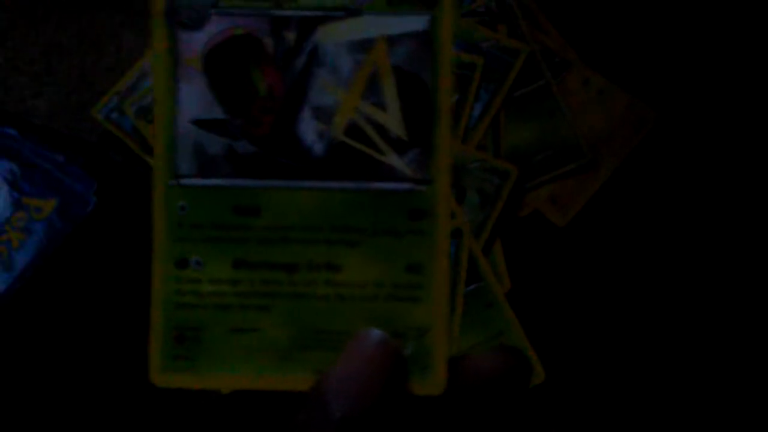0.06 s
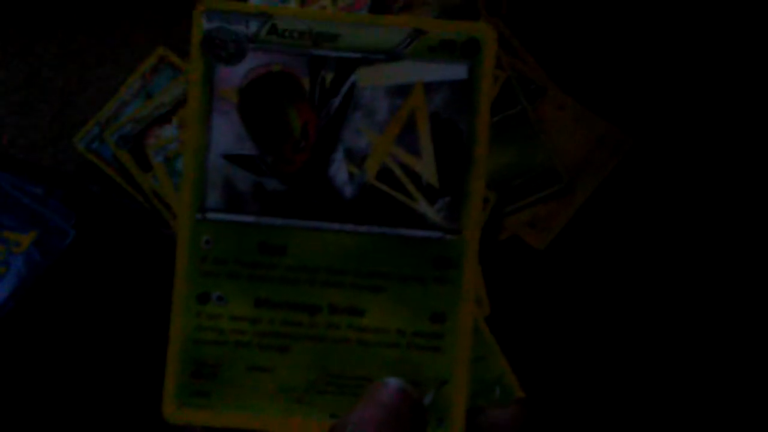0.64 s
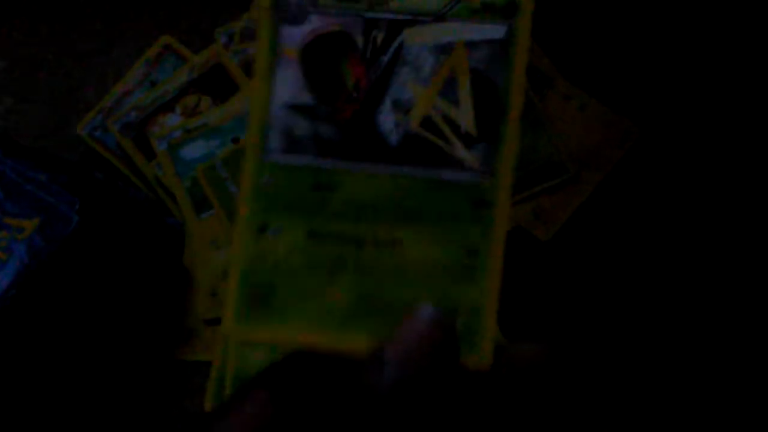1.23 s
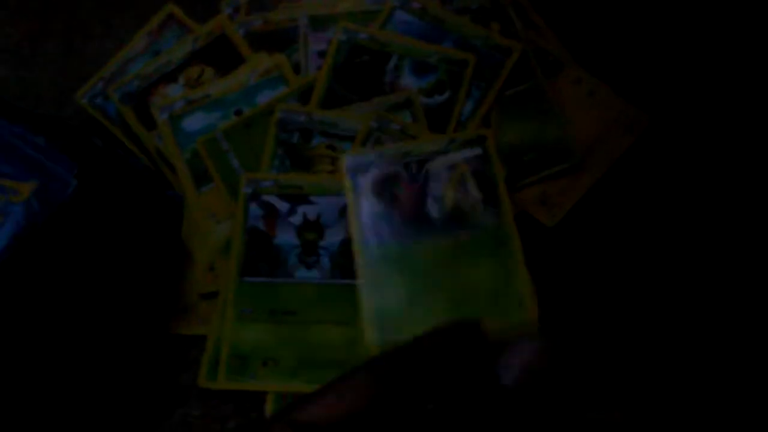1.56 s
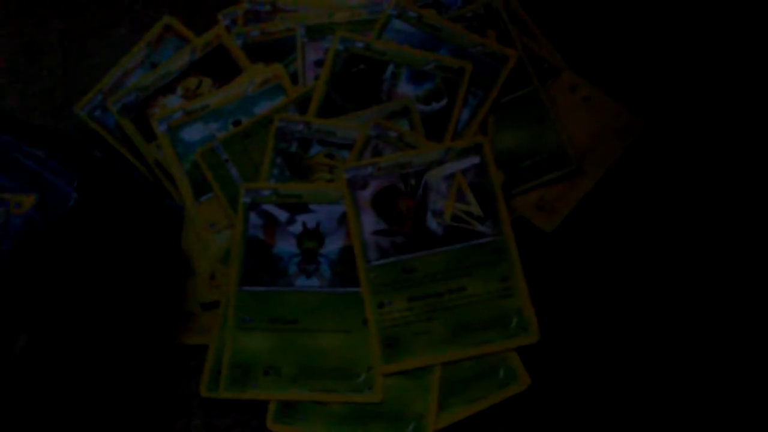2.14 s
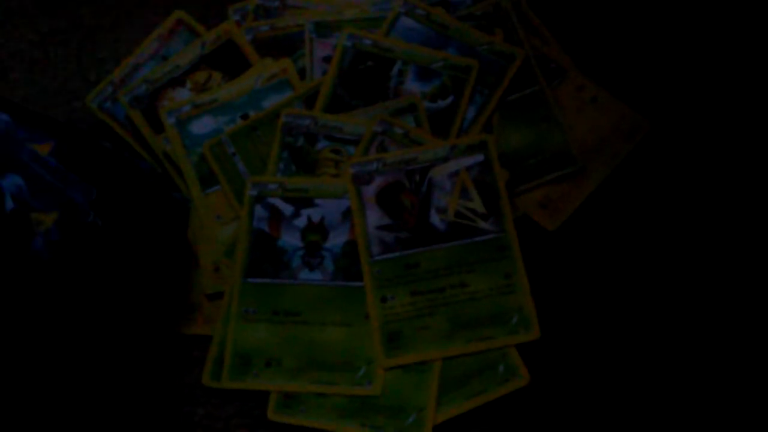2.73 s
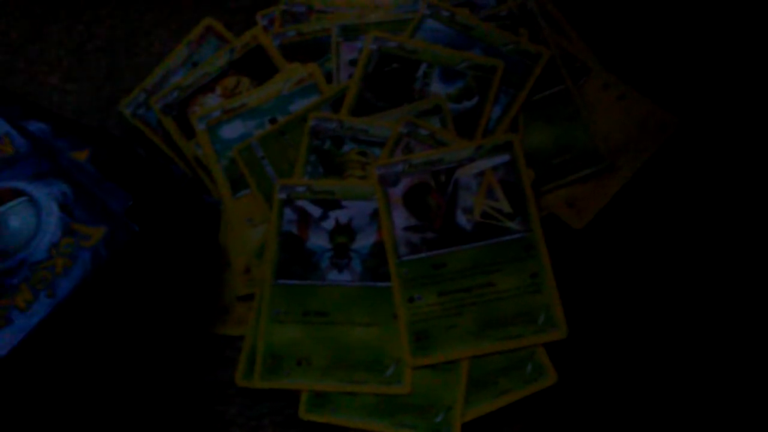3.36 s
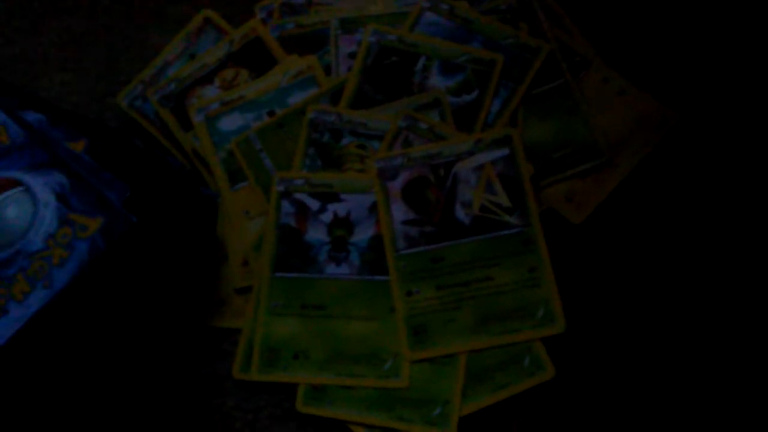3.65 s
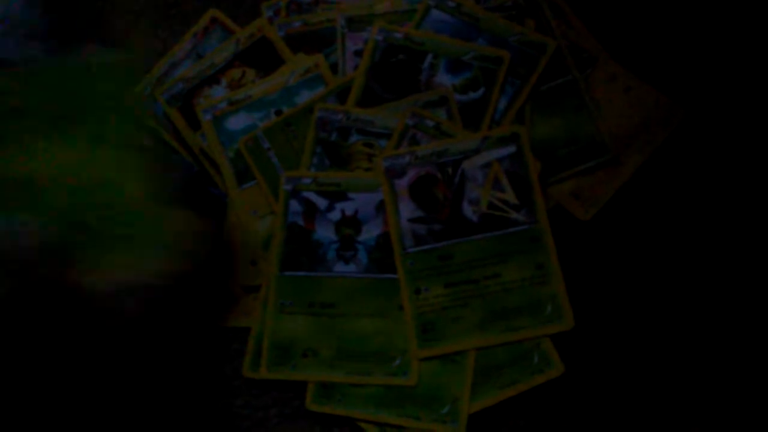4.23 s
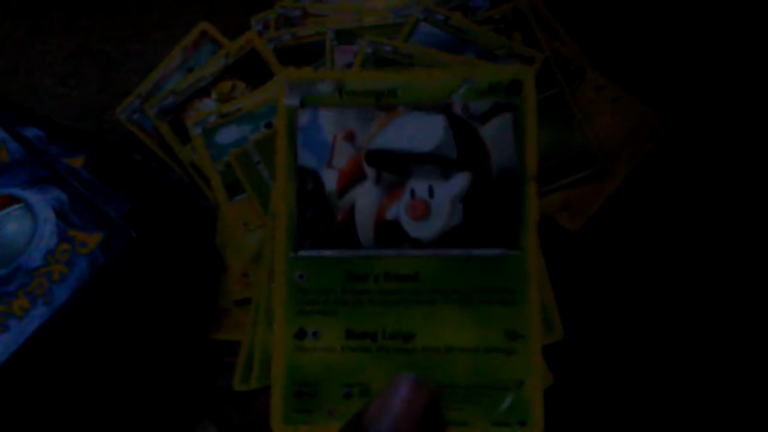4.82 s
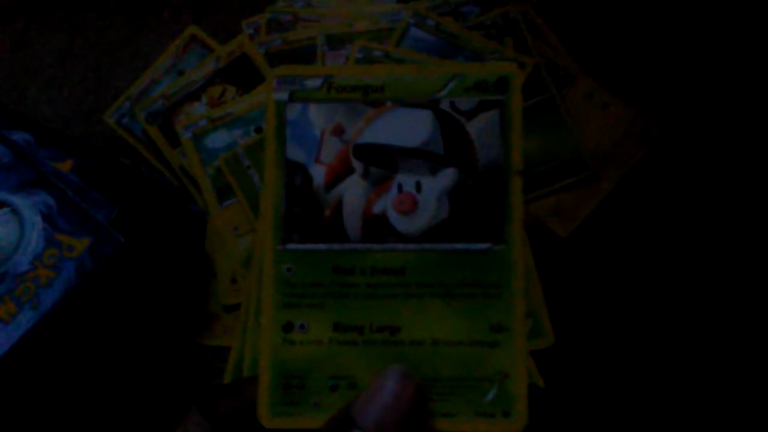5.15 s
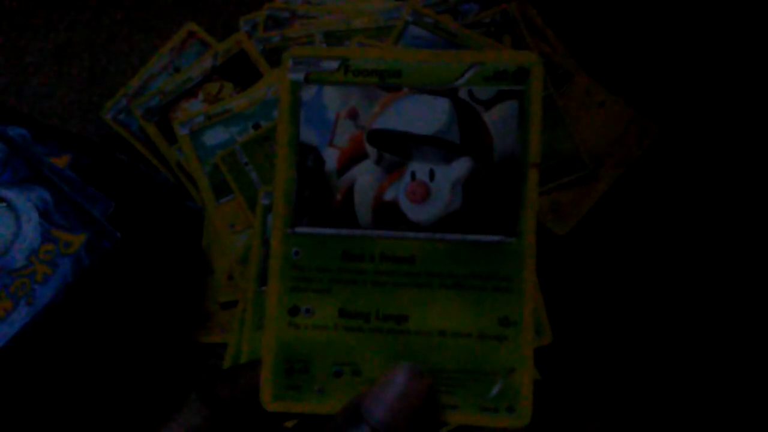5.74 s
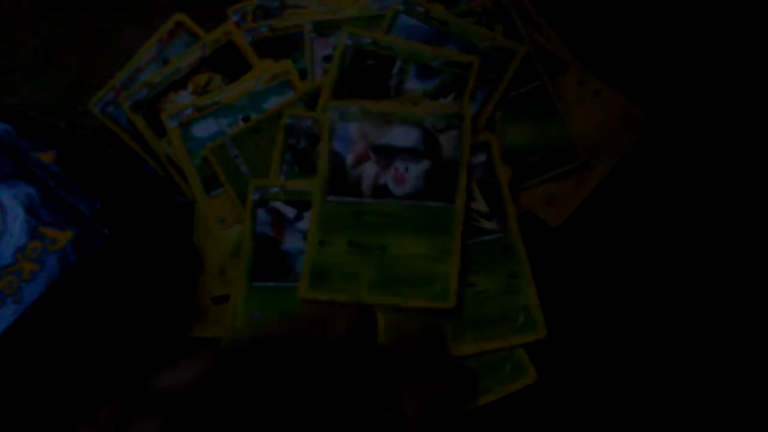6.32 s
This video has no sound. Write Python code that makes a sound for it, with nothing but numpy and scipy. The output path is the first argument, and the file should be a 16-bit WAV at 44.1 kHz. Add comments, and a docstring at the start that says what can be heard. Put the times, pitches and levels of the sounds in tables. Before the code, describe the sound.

Stiff trading cards snap onto a pile and slide with soft rustles and a faint squeak in a quiet room.

```python
"""A low room rumble and the dull rub of hands, then a stiff trading card snaps onto a pile on a table.
The next card is drawn from its stack with a rustle and a faint squeak, both made by sliding friction,
held up, and snapped down too. Each snap is a bowed card springing off the thumb: it cracks, rings
in its bending modes and settles in small ticks. Hands bump the table softly; the room is small and quiet."""
import sys
import numpy as np
from scipy import signal
from scipy.fft import rfft, irfft
from scipy.io import wavfile
from scipy.ndimage import uniform_filter1d

SR = 44100
rng = np.random.default_rng(int(sys.argv[2]) if len(sys.argv) > 2 else 0)


def inscribe(sig):
    """Save sig as 16-bit PCM at rate SR to the path in sys.argv[1].

    A 1-D sig is mono; a 2-D sig holds one channel per row.
    Samples are clipped to [-1, 1] before scaling.
    """
    pcm = np.round(np.clip(np.atleast_2d(sig).T, -1, 1) * 32767)
    wavfile.write(sys.argv[1], SR, pcm.astype(np.int16))


N = 290178
TIME = np.arange(N) / SR


def amp(db):
    """Amplitude ratio of a level in decibels."""
    return 10 ** (np.asarray(db) / 20)


def unit(x):
    """Normalisation to rms 1."""
    return x / np.sqrt(np.mean(x ** 2) + 1e-20)


def read(points, hz):
    """Interpolation of a spectrum along log frequency."""
    f, value = np.transpose(points)
    return np.interp(np.log(hz + 1), np.log(f), value)


def add(mix, s, sound):
    """Superposition of a sound on the mix at s seconds."""
    part = mix[round(s * SR):][:len(sound)]
    part += sound[:len(part)]


def colour(x, points, size=4096):
    """Minimum-phase filtering through points of frequency in Hz and gain in dB."""
    log_gain = np.log(amp(read(points, abs(np.fft.fftfreq(size, 1 / SR)))))
    taps = np.fft.ifft(np.exp(np.conj(signal.hilbert(log_gain)))).real
    return signal.fftconvolve(x, taps[:size // 2])[:len(x)]


def noise(points):
    """Gaussian noise of rms 1 with the given spectral shape."""
    return unit(colour(rng.standard_normal(N), points))


def drift(hz):
    """Random fluctuation of rms 1, low-passed at about hz."""
    low_pass = np.exp(-(np.fft.rfftfreq(N, 1 / SR) / hz) ** 2)
    return unit(irfft(rfft(rng.standard_normal(N)) * low_pass, N))


def resonate(x, hz, width_hz):
    """Forced response, scaled to rms 1, of a steep resonance that follows the curve hz."""
    turn = np.exp(2j * np.pi * np.cumsum(hz) / SR)
    r = np.exp(-np.pi * width_hz / SR)
    return unit((turn * signal.lfilter([(1 - r) ** 2], [1, -2 * r, r * r], x / turn)).real)


def stroke(s, db, swell_s, fade_s, roundness=1.4):
    """Envelope of one movement: it peaks at s and is 20 dB down swell_s before and fade_s after."""
    away = np.maximum((s - TIME) / swell_s, (TIME - s) / fade_s)
    return amp(db - 20 * np.clip(away, 0, 10) ** roundness)


def strokes(rows):
    """Incoherent addition: the powers of several movements sum."""
    return np.sqrt(sum(stroke(*row) ** 2 for row in rows))


def room_rumble(level_db=-62, waver_db=1.47):
    """Ambient noise: a rumble and a faint hiss under gentle random amplitude modulation."""
    # Room noise. Each row: frequency in Hz, relative spectral density in dB.
    spectrum = [(18, -39.5), (30, -6), (59, 3.5), (106, -13.5), (134, -20.5), (233, -16.5), (266, -20),
                (426, -17.5), (649, -20), (780, -20), (2170, -28), (2680, -25), (3400, -30.5), (5590, -32),
                (16000, -37.5)]
    return amp(level_db + waver_db * drift(19)) * noise(spectrum)


def hand_rub(gain_db=-3, rest_db=-68, fidget_db=2.5):
    """Skin friction makes a dull, uneven noise that swells as the grip shifts."""
    # Shifts of grip. Each row: peak time in seconds, relative level in dB, swell and fade in seconds.
    grips = [(.38, -56.5, 1, 0.29), (1.1, -58, 1, 0.89), (1.58, -52, 0.36, 0.27), (2.33, -63.5, 0.24, 1),
             (3.23, -56.5, 0.43, 0.49), (3.75, -58, 0.39, 0.5), (4.45, -61, 0.28, 0.49),
             (5.3, -67, .3, .45), (6.0, -59.5, .3, .7)]
    # Rubbing skin. Each row: frequency in Hz, relative spectral density in dB.
    spectrum = [(30, -29), (60, -4), (105, 4), (200, -9), (450, -17.5), (900, -26), (2000, -38)]
    envelope = np.hypot(amp(rest_db), strokes(grips)) * amp(fidget_db * drift(8))
    return amp(gain_db) * envelope * noise(spectrum)


def mains_hum():
    """Steady partials lie near the mains frequency and its harmonics."""
    # The hum. Each row: frequency in Hz, rms level in dB.
    partials = [(59.5, -77), (120, -79), (239, -80.5)]
    return sum(amp(db) * np.sqrt(2) * np.sin(2 * np.pi * (hz * TIME + rng.random()))
               for hz, db in partials)


def reverberation(x, near_db=-17, near_t60=0.078, tail_db=-17, delay_s=.005, size=128):
    """A diffuse field is noise whose energy decays exponentially: table scatter, then the room."""
    # The room's decay. Each row: frequency in Hz, time to fall 60 dB in seconds.
    decay_times = [(200, 0.1), (1000, 0.13), (4000, 0.28), (8000, 0.32), (15000, 0.1976)]
    # The tone of the reflections. Each row: frequency in Hz, gain in dB.
    response = [(150, -0.5), (600, 7.5), (1000, 6.5), (1500, 5.5), (2600, 3.5), (4000, 0), (5500, -3.5),
                (8000, -3.5), (14000, 0.5)]
    hz, _, spectra = signal.stft(x, SR, nperseg=size)
    power = abs(uniform_filter1d(abs(spectra) ** 2, size=3, axis=0))
    step_s = size / 2 / SR
    field = np.zeros(power.shape)
    for band, room_t60 in enumerate(read(decay_times, hz)):
        for db, t60 in (near_db, near_t60), (tail_db, room_t60):
            retained = np.exp(-2 * np.log(1000) * step_s / t60)
            field[band] += amp(db) ** 2 * signal.lfilter([1 - retained], [1, -retained], power[band])
    carrier = signal.stft(rng.standard_normal(N), SR, nperseg=size)[2]
    diffuse = signal.istft(carrier / carrier.std() * np.sqrt(field), SR, nperseg=size)[1][:N]
    out = np.zeros(N)
    add(out, delay_s, colour(diffuse, response))
    return out


def with_echoes(x):
    """Comb filtering: early reflections join the direct sound within a few milliseconds."""
    # Reflections off hand and table. Each row: delay in seconds, gain in dB.
    reflections = [(.0015, -12.5), (.0031, -19.5)]
    out = x.copy()
    for delay_s, db in reflections:
        add(out, delay_s, amp(db) * x)
    return out


def table_bumps(table_hz=62, thud_s=0.018, rise_s=0.0064, knock_s=0.0084):
    """A soft impact excites a damped low mode of the table top, under a short dull knock."""
    # Bumps of a hand or card. Each row: start in seconds, thud level and knock level in dB.
    bumps = [(1.365, -34, -51), (1.5, -29.5, -51), (1.509, -26, -64), (1.531, -34, -40.5),
             (1.574, -40, -60), (3.256, -51, -53), (3.324, -49, -60), (6.18, -51, -52.5),
             (6.358, -45, -36.5), (6.377, -47, -40), (6.387, -59, -44), (6.395, -40, -49),
             (6.43, -41, -42.5)]
    knock_spectrum = [(80, 0), (220, 7.5), (400, -2.0), (850, -4.5), (1400, -28.5), (4000, -44)]
    t, out = np.arange(SR // 5) / SR, np.zeros(N)
    thud = -np.sin(2 * np.pi * table_hz * t) * np.exp(-t / thud_s) * (1 - np.exp(-t / rise_s))
    for s, thud_db, knock_db in bumps:
        knock = unit(colour(rng.standard_normal(len(t)), knock_spectrum)) * np.exp(-t / knock_s)
        add(out, s, amp(thud_db) * thud + amp(knock_db) * knock)
    return out


def face_glide(gain_db=-2):
    """Sliding friction between glossy faces makes a broadband hiss that grows with speed."""
    # Glides. Each row: peak time in seconds, relative level in dB, swell and fade in seconds.
    glides = [(.75, -70.5, .17, .85), (1.42, -64.5, 0.34, 0.27), (1.88, -62, 0.62, 0.48),
              (2.15, -66, 0.33, 0.82), (2.52, -65, .04, 0.57), (2.79, -67.5, 0.14, 0.46),
              (3.085, -52, 0.097, 0.16), (3.42, -62.5, 0.21, 0.6), (3.695, -56, 0.074, .04),
              (3.83, -63.5, 0.32, 0.88), (4.22, -64, 0.47, 0.86), (4.48, -69.5, 0.14, .2),
              (6.19, -60, 0.15, 0.14), (6.35, -61, 0.11, 0.11), (6.55, -59.5, 0.28, 0.11)]
    # The hiss. Each row: frequency in Hz, relative spectral density in dB.
    spectrum = [(1500, -24.5), (3000, -6.5), (5000, -4.5), (7800, -2.5), (10000, -5), (12000, -10),
                (16000, -16)]
    return amp(gain_db) * noise(spectrum) * strokes(glides)


def edge_scrape(catches_per_s=2400, spread_db=3.0, judder_db=1.5, rasp_db=-4, sing_db=-5.5):
    """Fibres catch under a moving edge, and the impulses force the card's free part to resonate."""
    # Scrapes over the cards below. Each row: peak time in seconds, relative level in dB,
    # swell and fade in seconds, resonance of the free part in Hz.
    scrapes = [(1.39, -58, 0.24, .19, 5190), (1.534, -56, 0.01, 0.011, 4940),
               (1.975, -49, 0.028, 0.051, 3850), (2.514, -56.5, .035, 0.06, 5200),
               (2.559, -59.5, 0.042, 0.085, 4400), (2.752, -58, 0.018, .035, 5460),
               (2.995, -60, .02, .04, 5200), (3.086, -42, 0.055, 0.065, 4940),
               (3.132, -47, 0.022, .028, 5325), (3.182, -47.5, 0.012, .06, 5290),
               (3.26, -51, 0.14, 0.062, 4514), (3.375, -54, 0.15, 0.046, 5400),
               (3.696, -56, .05, 0.052, 5800), (3.756, -58, .015, 0.063, 4800),
               (3.87, -62, .09, 0.082, 4600), (6.2, -67.5, 0.33, 0.16, 5000),
               (6.553, -53.5, 0.048, 0.072, 4800)]
    # The rasp. Each row: frequency in Hz, relative spectral density in dB.
    spectrum = [(760, -53.5), (1300, -43), (1690, -26), (2340, -4), (3240, -8), (3350, -6), (3920, -1),
                (4540, -2), (4930, -6), (5720, 0.5), (6620, -4), (8790, -11), (9660, -15), (14600, -28),
                (16000, -33)]
    # Modes of the free part. Each row: ratio to its resonance, width in Hz, relative level in dB.
    modes = [(.72, 600, -8.5), (.97, 800, 3.5), (1.18, 900, 1), (1.45, 1300, -6.5)]
    caught = rng.random(N) < catches_per_s / SR
    strength = amp(spread_db * np.minimum(rng.exponential(1, N), 5))
    catches = unit(caught * strength * rng.choice([-1, 1], N))
    friction = (catches + 0.85 * rng.standard_normal(N)) * amp(judder_db * drift(70))
    power = np.array([stroke(*row[:4]) ** 2 for row in scrapes])
    hz = np.array(scrapes)[power.argmax(0), 4]  # the strongest stroke sets the resonance
    sing = unit(sum(amp(db) * resonate(friction, ratio * hz, width) for ratio, width, db in modes))
    rasp = unit(colour(friction, spectrum))
    return (amp(rasp_db) * rasp + amp(sing_db) * sing) * np.sqrt(power.sum(0))


def squeak(gain_db=-2, mid_hz=4230, mid_s=2.22, rise_hz_per_s=550, width_hz=290, flutter_db=2.6):
    """Stick-slip friction drives a narrow resonance of the drawn card; a hard pull wakes others."""
    # Pulls on the card. Each row: peak time in seconds, relative level in dB, swell and fade in seconds.
    pulls = [(2.125, -59, 0.15, 0.1), (2.28, -51.5, 0.081, 0.25)]
    # Side modes. Each row: ratio to the main frequency, width in Hz, relative level in dB.
    modes = [(.5, 220, -10.5), (.54, 220, -9), (.645, 240, -8), (1.115, 300, -7.5)]
    hz = mid_hz + rise_hz_per_s * (TIME - mid_s)  # the free part shortens, so its note climbs
    pull = strokes(pulls)
    friction = rng.standard_normal(N) * amp(flutter_db * drift(50))
    main = resonate(friction, hz, width_hz)
    others = sum(amp(db) * resonate(friction, ratio * hz, width) for ratio, width, db in modes)
    return amp(gain_db) * pull * (main + (pull / pull.max()) ** 0.17 * others)


def flick(edge_db, slap_db, ring_db, belly_db, rise_s, flex_s, fibres_db,
          bowed_hz=6700, flat_hz=4000, relax_s=.0018, belly_hz=2320, belly_s=0.002,
          travel_s=0.001, crack_db=10, fibres_s=0.0025):
    """Free vibration of a released card: a dispersed crack, a falling note and ringing modes."""
    # Modes of the card on its pile. Each row: frequency in Hz, relative level in dB, T60 in seconds.
    modes = [(426.7, -28, 0.062), (577.8, -26.5, 0.047), (782, -23, 0.014), (1040, -35.5, .02),
             (1480, -23.5, 0.025), (2130, -19.5, .02), (2660, -32, 0.029), (3020, -11.5, .025),
             (3420, -18, 0.027), (3950, -12, 0.03), (4330, -12.5, 0.022), (4860, -17.5, .02),
             (5544, -28.5, 0.0142), (5900, -26, .014), (7580, -25, 0.015), (9755, -34, 0.0077),
             (12100, -35.5, 0.0039)]
    # The crack of a freed edge. Each row: frequency in Hz, gain in dB.
    crack_spectrum = [(200, -18), (600, -6), (1200, -9.5), (2400, 1), (5500, 0.5), (7500, 5), (9300, -3),
                      (10500, -4), (12500, -12.5), (16000, -29)]
    t, bins = np.arange(SR // 12) / SR, np.fft.rfftfreq(SR // 12, 1 / SR)
    onset = 1 - np.exp(-(t / rise_s) ** 2)
    # a bowed corner is stiffer, so its note drops as it flattens
    hz = flat_hz + (bowed_hz - flat_hz) * np.exp(-t / relax_s)
    flex = np.sin(2 * np.pi * np.cumsum(hz) / SR) * np.exp(-t / flex_s)
    belly = amp(belly_db) * np.sin(2 * np.pi * belly_hz * t) * np.exp(-t / belly_s)  # whole-card flex
    # bending waves run faster at high pitch: the treble of the crack arrives first
    bend = irfft(np.exp(-2j * np.pi * 2 * travel_s * np.sqrt(flat_hz * bins)), len(t))
    fibres = rng.standard_normal(len(t)) * np.exp(-t / fibres_s)
    crack = colour(amp(crack_db) * bend + amp(fibres_db) * fibres, crack_spectrum)
    # each grip detunes the modes a little
    ring = sum(amp(db - 60 * t / t60) * np.sin(2 * np.pi * (f * rng.normal(1, .005) * t + rng.random()))
               for f, db, t60 in modes)
    # the slap on the pile sets the low end, the sharpness of the edge the treble
    tone = [(900, slap_db), (3000, 0.0093), (5800, 0.0048), (8200, edge_db)]
    return colour(onset * (flex + belly + crack + amp(ring_db) * ring), tone)


def settling_ticks():
    """Small impacts excite the card as its edges and corners catch, bounce and settle."""
    # Contacts. Each row: start in seconds, then overall, edge and slap gains in dB.
    ticks = [(1.5567, -49, 6, -3), (1.5826, -22, -8, -3.5), (1.6908, -40.5, 7.5, 5), (1.695, -42, -4, -7),
             (1.7197, -41.5, -1, 8), (1.729, -37.5, 9.5, 13.5), (1.7305, -31, -16, 5.5),
             (3.106, -45, -13, -12), (3.179, -50, -2, -14), (3.3854, -42, -8, -6), (3.4294, -40.5, 3, -14),
             (3.433, -35, -2, -12), (6.3676, -28, -3, -2), (6.3776, -44, -3, 5), (6.418, -43, 13, -12),
             (6.428, -26.5, -3, 10.5), (6.4339, -31, 0, 4), (6.4458, -29.5, -6, -13),
             (6.4518, -39, 5, 12.5), (6.461, -30.5, -6, -3), (6.4678, -33, 0, -35), (6.4763, -36.5, 0, 2)]
    out = np.zeros(N)
    for s, db, edge_db, slap_db in ticks:
        tick = flick(edge_db, slap_db, ring_db=1.5, belly_db=-13.5,
                     rise_s=0.00066, flex_s=0.0026, fibres_db=-4.5)
        add(out, s, amp(db) * tick)
    return out


def card_snaps(slip_lead_s=.0016):
    """Elastic energy is released as a bowed card slips off the thumb, springs free and lands."""
    # Snaps. Each row: time in seconds; overall, edge, slap, ring, belly and room-spill gains in dB;
    # release in seconds, slip gain in dB, flight in seconds, landing gain in dB.
    snaps = [(1.5748, -6, 8.5, 3.5, -1.5, -25, 0, 0.00091, -14.5, 0.0037, -20.5),
             (6.3561, -15.5, 1, 4, 1, -10.5, 3.5, 0.00074, -38, 0.0053, -29),
             (6.4050, -3.5, -7, -3, -7.5, -6.5, -6, 0.00036, -27, .0028, -31)]
    # The tones of slip and landing. Each lists edge, slap, ring and belly gains in dB.
    slip_tone = (0.5, -12.5, -9, -10)
    landing_tone = (-7.5, -5.5, 4, -19)
    direct, spill = np.zeros(N), np.zeros(N)  # towards the listener, into the room
    for s, db, *snap_tone, spill_db, release_s, slip_db, flight_s, landing_db in snaps:
        stages = [(s - slip_lead_s, slip_db, slip_tone),
                  (s, db, snap_tone),
                  (s + flight_s, landing_db, landing_tone)]
        for start_s, stage_db, tone in stages:
            snap = amp(stage_db) * flick(*tone, rise_s=release_s, flex_s=0.0018, fibres_db=-8.5)
            add(direct, start_s, snap)
            add(spill, start_s, amp(spill_db) * snap)
    return direct, spill


def scene():
    """All sources superpose in one channel; snaps, ticks and rustle also excite the room."""
    direct, spill = card_snaps()
    ticks = settling_ticks()
    rustle = edge_scrape() + face_glide()
    cards = with_echoes(direct + ticks) + rustle + reverberation(spill + ticks + rustle) + squeak()
    return (cards + table_bumps() + room_rumble() + hand_rub() + mains_hum())[None]


def record(dry, low_cut_hz=42, high_cut_hz=15900):
    """Band limiting: the microphone's low cut, then a steep low-pass filter."""
    high_pass = signal.butter(3, low_cut_hz, "high", fs=SR, output="sos")
    low_pass = signal.firwin(511, high_cut_hz, window=("kaiser", 9), fs=SR)
    return signal.oaconvolve(signal.sosfilt(high_pass, dry), low_pass[None], "same")


dry = scene()
out = record(dry)
inscribe(out)
```